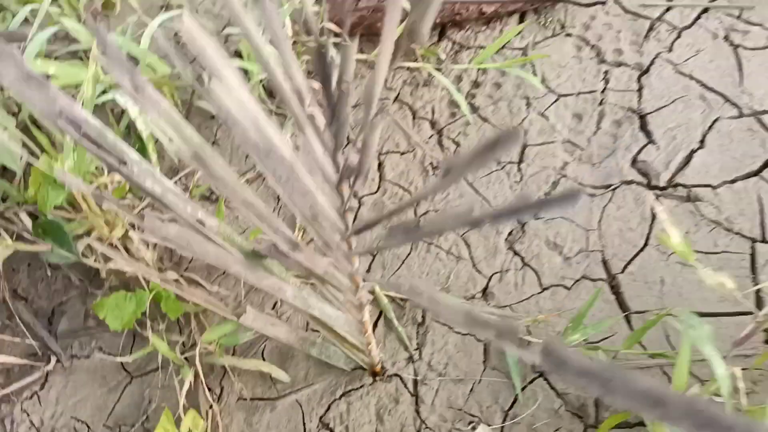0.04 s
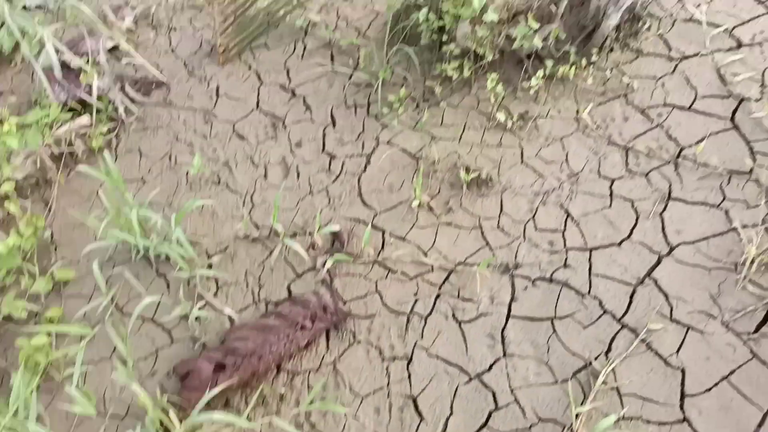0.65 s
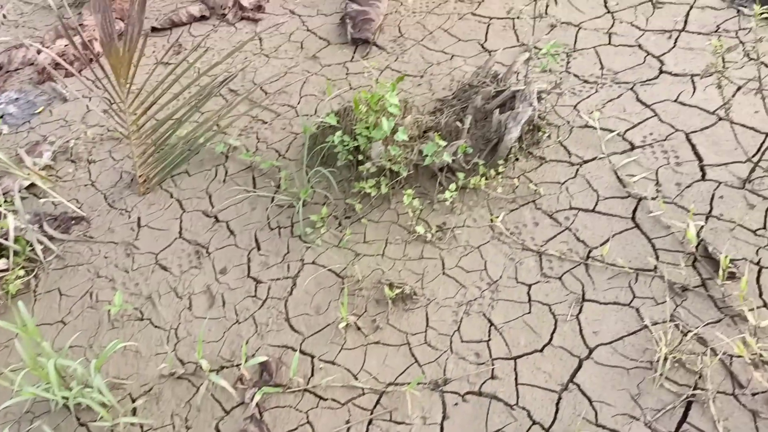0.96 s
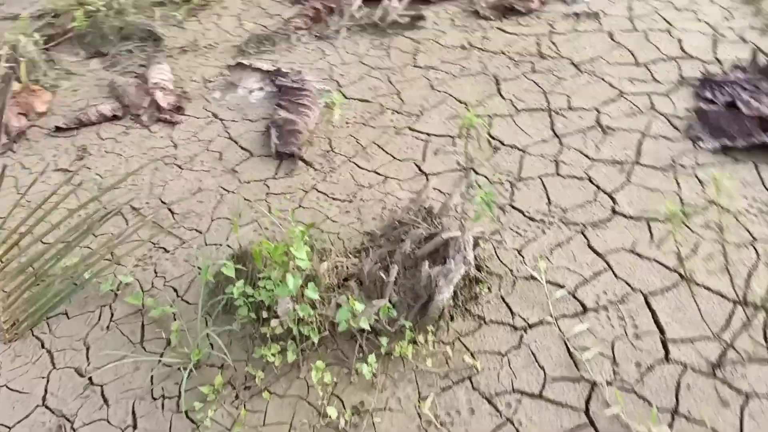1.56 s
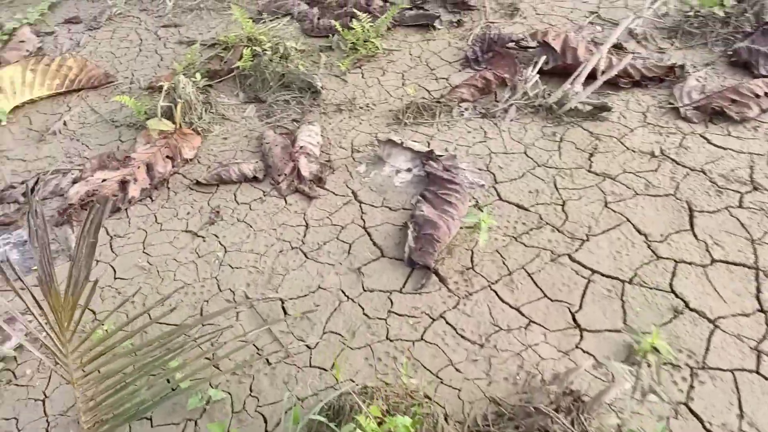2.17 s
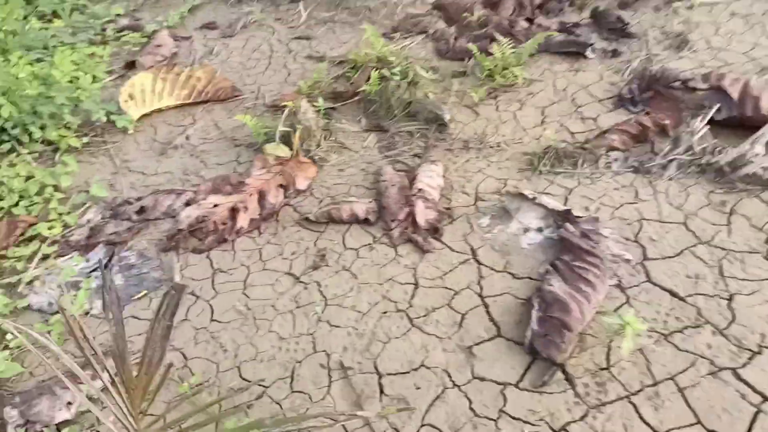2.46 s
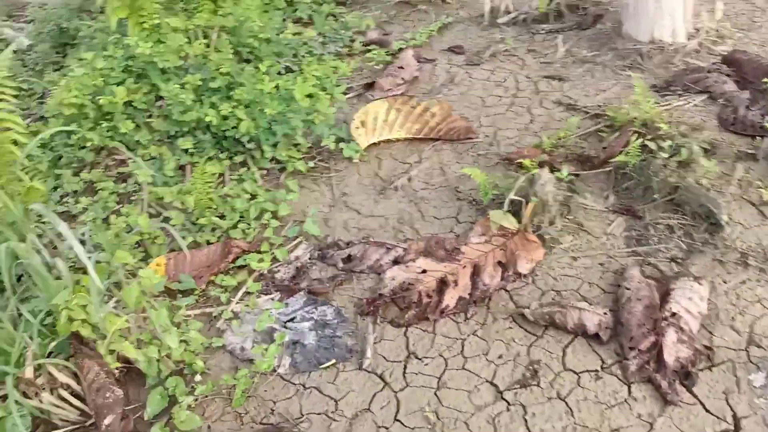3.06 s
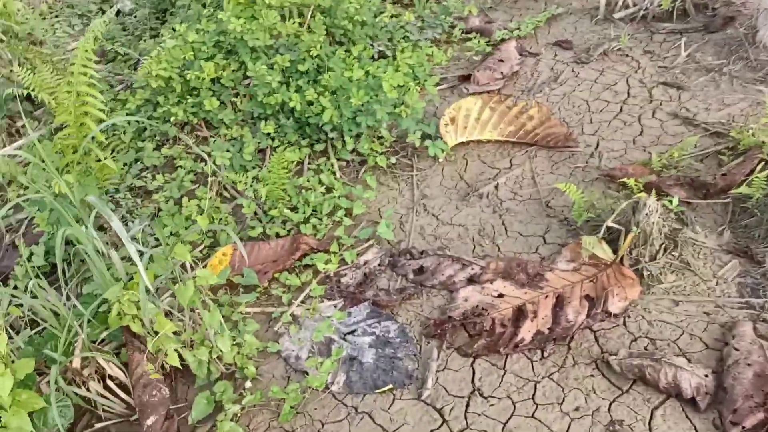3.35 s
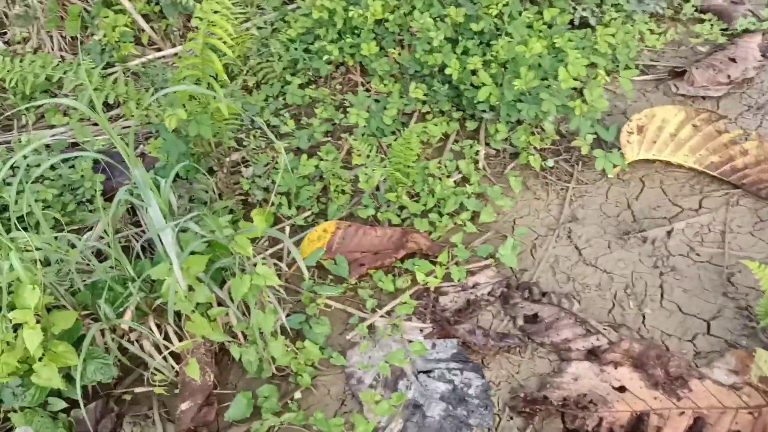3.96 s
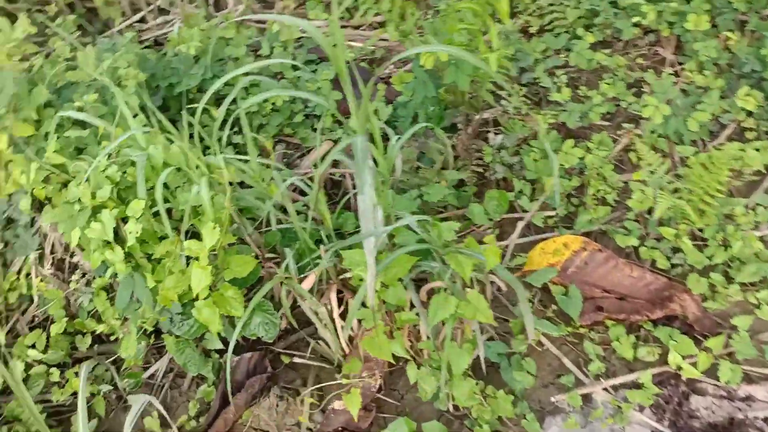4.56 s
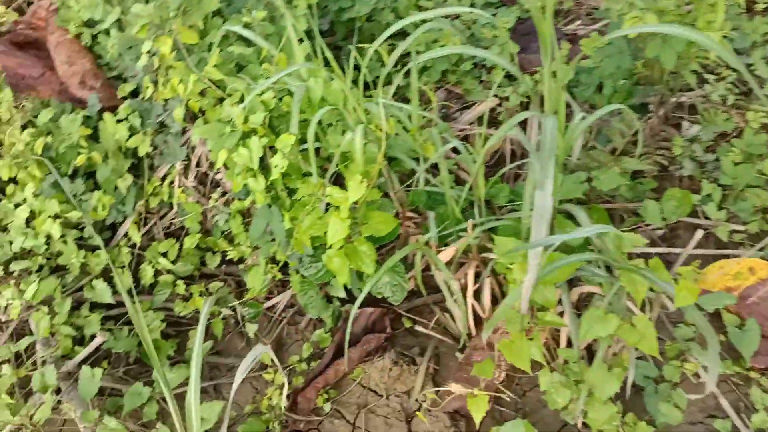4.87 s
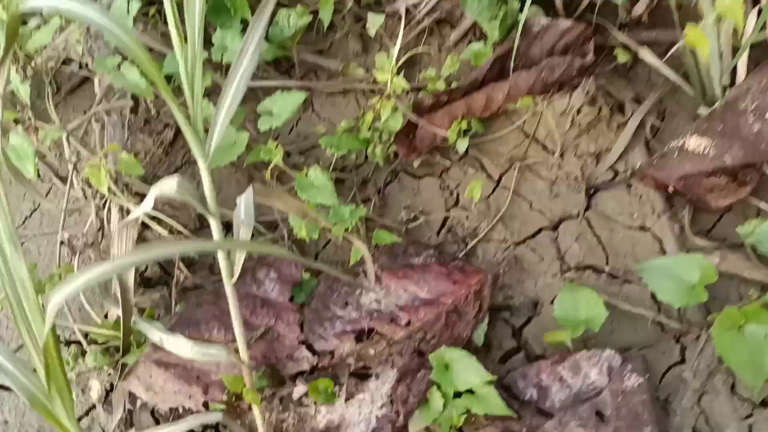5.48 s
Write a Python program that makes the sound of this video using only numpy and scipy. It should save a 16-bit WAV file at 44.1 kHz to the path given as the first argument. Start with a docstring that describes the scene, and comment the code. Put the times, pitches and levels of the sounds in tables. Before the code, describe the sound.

A very bright hiss comes and goes close to the left of the microphone, at times breaking into thin, fluttering whistles. Around it, crickets shrill steadily and buzz in pulses over a soft rush of open air, and a small bird chips about four times a second before pausing. Someone walks slowly over cracked mud at the edge of a field, with light thuds, gritty scuffs and a few sharp cracks of dry stalks.

```python
"""Soft steps thud and snap dry litter on a slow walk over cracked mud, at the edge of a weedy field.
Each sole knocks the ground, and each stalk cracks and rings. Close on the left a very high hiss
swells and at times turns into thin gliding whistles. Crickets scrape their wings: a chorus shrills,
and two nearer ones buzz and trill in pulses. A small bird repeats a falling chip. Behind it all
are the soft rush of open air and, at the start, one faint far whistle."""
import sys
import numpy as np
from scipy import signal
from scipy.fft import rfft, irfft
from scipy.io import wavfile
from scipy.ndimage import uniform_filter1d, map_coordinates

SR = 44100
rng = np.random.default_rng(int(sys.argv[2]) if len(sys.argv) > 2 else 0)


def log_audio(samples):
    """Write samples as a 16-bit WAV file to the path given in sys.argv[1]."""
    # one column per channel
    frames = np.atleast_2d(samples).T
    # limit to full scale, then quantise
    limited = np.clip(frames, -1, 1)
    pcm = np.round(limited * 32767).astype(np.int16)
    wavfile.write(sys.argv[1], SR, pcm)


N = 252252
T = np.arange(N) / SR

# Which side the air, grit and rumble lean to. Each row: frequency in Hz, left minus right in dB.
AIR_BALANCE = [(100,-0.5),(600,-0.5),(1400,2.5),(3200,1.5),(5000,3.5),(8500,-2.5),(11000,9.5),(14500,-34)]


def footfalls():
    """A sole thuds on dry mud; a harder landing rings the higher tones more."""
    # Each row: start in seconds, level in dB, length in seconds, hardness in dB per octave,
    # amount of crumbling from 0 to 1.
    steps = [(.023,-32,.05,4.5,.04),(2.102,-43,.056,2,.05),(2.349,-42,.03,2,.03),(2.635,-37,.04,-5,.02),(2.659,-40,.032,2,.03),(3.145,-42,.029,3,.04),(3.168,-42,.029,2.5,.04),(3.683,-36,.04,-5,.02),(3.802,-48,.042,2,.05),(3.865,-45,.03,4,.04),(4.452,-36,.02,1,.02),(4.464,-24.5,.04,-10,.012),(4.48,-41,.11,-1,.07),(5.121,-46,.05,1,.05),(5.326,-39,.04,-2,.04)]
    # The tones of a sole on mud. Each row: pitch in Hz, level in dB, ring time in seconds.
    sole_tones = [(280,-12.5,0.056),(356,-2.5,0.028),(474,1,0.021),(707,0,0.0072),(1010,-3,0.0049),(1480,-29.5,0.037)]
    thuds = 0
    for k, (hz, tone_db, t60) in enumerate(sole_tones):
        octaves = np.log2(hz / sole_tones[1][0])
        pushes = blows([(s, db + hardness * octaves, length, crumble)
                        for s, db, length, hardness, crumble in steps])
        thuds = thuds + (-1) ** k * from_db(tone_db - 2.5) * ring(pushes, hz, t60)
    return foliage(thuds, wet_db=-16, t60=.14)


def snapping_stalks():
    """A dry stalk breaks with a sharp crack, then rings briefly."""
    # Each row: start in seconds, level in dB, extra level for the crack in dB.
    snaps = [(.024,-37,-10),(.166,-44,16.5),(1.575,-33,-2),(1.621,-37,-8),(2.28,-40,-14),(2.303,-40,-14),(2.337,-36,-10),(2.631,-45,-14),(2.935,-42,-10),(3.142,-43,-14),(3.166,-48,-14),(4.326,-40,-8),(4.541,-44,-10),(5.308,-42,-12),(5.313,-28,-13)]
    # The tones of a dry stalk. Each row: pitch in Hz, level in dB, ring time in seconds.
    stalk_tones = [(930,-8.5,0.0099),(1170,-1,0.0054),(1630,5,0.0081),(1770,4.5,0.0047),(2355,7,0.0057),(2810,0.5,0.0044),(3700,-5,0.0057),(4830,-4.5,0.011)]
    pushes = blows([(s, db, .012, .028) for s, db, _ in snaps])
    rings = sum((-1) ** k * from_db(db) * ring(pushes, hz, t60)
                for k, (hz, db, t60) in enumerate(stalk_tones))
    cracks = blows([(s, db + crack_db, .004, .15) for s, db, crack_db in snaps])
    cracks = signal.sosfilt(signal.butter(2, [2500, 10000], "band", fs=SR, output="sos"), cracks)
    return foliage(from_db(-5) * rings + from_db(8) * cracks, wet_db=-9, t60=.1) * pan(2.5)


def shifting_grit():
    """Grit and leaves shift underfoot, making a grainy noise."""
    # Each row: start and end in seconds, level at the start and at the end in dB.
    scuffs = [(0,.36,-47,-53.5),(.81,.88,-53.5,-61),(1.15,1.62,-71,-54.5),(2.08,2.14,-56.5,-58),(2.28,2.37,-59,-68),(2.45,2.66,-63,-64),(3.13,3.2,-79,-60),(3.66,4.05,-68,-66),(4.46,4.8,-57.5,-64),(5.32,5.38,-55,-57.5),(5.6,5.72,-63,-54)]
    # The tone colour of a scuff. Each row: frequency in Hz, level in dB.
    colour = [(150,-41),(450,5),(900,-11.5),(1450,-4.5),(2500,-2.5),(5000,-3),(12000,-90)]
    grains = rng.standard_normal((2, N)) * from_db(3.5 * np.minimum(drift(250), 2))
    return swells(scuffs, rise_db_per_s=148, fall_db_per_s=99) * coloured(grains, colour, AIR_BALANCE)


def high_hiss():
    """A very bright hiss swells close on the left; its low part and top tones vary from swell to swell."""
    # Each row: start and end in seconds, level at the start and at the end in dB,
    # boost of the top tones in dB, boost of the low part in dB.
    hiss_swells = [(0,0.4,-53,-80,3,5),(0.783,1.116,-41,-42.5,5.5,-5.5),(1.156,1.388,-43,-46.5,1,-5),(1.425,1.617,-40.5,-38.5,2,-4.5),(1.779,1.782,-57.5,-61,-2,11.5),(1.871,1.865,-63,-53,-5,4),(2.114,2.162,-45.5,-49.5,-5,-4.5),(2.329,2.605,-49.5,-46,-4,1),(3.28,3.677,-54,-38.5,-5,-5.5),(3.826,3.812,-53,-44,-13,-7),(3.958,4.016,-57,-66,-9,8.5),(4.44,5.092,-47.5,-50.5,-15,-1.5),(5.19,5.228,-45,-44.5,-7,-4.5),(5.658,5.718,-40,-41.5,-1,-2.5)]
    # The tone colour of the hiss. Each row: frequency in Hz, level in dB.
    colour = [(1500,-14.5),(2400,-13),(3100,-1),(3800,-5.5),(4300,1),(6000,-5),(9500,-6.5),(10200,-5),(10800,0),(11250,-1),(11750,4),(13200,-9.5),(14200,-7),(15200,-17.5)]
    # Which side it leans to. Each row: frequency in Hz, left minus right in dB.
    balance = [(3000,-0.5),(9000,2.5),(10500,10),(13000,5.5),(15000,-18)]
    # Tones that ring in the hiss. Each row: pitch in Hz, level in dB, ring time in seconds.
    hiss_tones = [(12300,-5.5,.008),(13300,-5,0.0042),(13700,-17,.015)]
    rest_db, split_hz = -59, 9000
    rows = np.array(hiss_swells)
    plain_gain, top_gain, low_gain = [
        from_db(rest_db) + swells(rows[:, :4] + boost * np.array([0, 0, 1, 1]),
                                  rise_db_per_s=221, fall_db_per_s=351)
        for boost in (0, rows[:, 4:5], rows[:, 5:])]
    direct = near_left(rng.standard_normal(N), pan_db=0)
    scatter = rng.standard_normal((2, N))
    left, right = direct + scatter
    hiss = coloured(np.array([left + right, left - right]), colour, balance)
    low_part = signal.sosfiltfilt(signal.butter(2, split_hz, fs=SR, output="sos"), hiss)
    ringing = 0
    for k, (hz, db, t60) in enumerate(hiss_tones):
        gain = (top_gain if k else plain_gain) * from_db(db)
        ringing = ringing + gain * rms_one(ring(rng.standard_normal(N), hz, t60))
    flicker = from_db(.6 * drift(40))
    return flicker * (plain_gain * (hiss - low_part) + low_gain * low_part + near_left(ringing, pan_db=17))


def whistles():
    """Thin tones fan out and flutter as an arc of pitch climbs; past its turn they settle and close up."""
    # Each row: time of the turn, time before it and time after it in seconds, pitch at the turn in Hz,
    # drop at the ends in Hz, level in dB, raggedness from 0 to 1.
    arcs = [(2.32,.055,.04,12050,1400,-46,0),(2.382,.028,.025,12250,400,-39.5,.1),(2.468,.06,.054,15000,3000,-39,.5),(2.583,.056,.04,14750,2900,-38.5,.25),(2.72,.06,.1,12050,-500,-57,0),(2.872,.04,.04,10400,200,-53.5,0),(2.985,.02,.025,10450,400,-52,0),(4.435,.06,.07,12850,1400,-43.5,0),(4.525,.03,.03,11450,-300,-49,0),(4.63,.075,.08,15000,1700,-38.5,.8),(4.755,.055,.04,13400,400,-38,.6),(4.81,.035,.065,14500,1700,-37,.35),(4.895,.025,.025,11550,-250,-38.5,0),(4.97,.05,.055,14300,2000,-38,.9),(5.075,.045,.04,13700,1700,-40.5,.5),(5.212,.024,.03,13500,1900,-40,.5),(5.3,.05,.045,10300,-350,-55,0)]
    # The tones of the fan. Each row: share of the top tone's climb, level in dB.
    fan = [(1,0),(.84,-6),(.62,-6),(.45,-2),(.3,-3),(.14,-1),(-.25,-5)]
    # How strong a tone is as it glides. Each row: pitch in Hz, level in dB.
    colour = [(9000,-24),(10200,-10),(11100,-8),(11600,4),(12200,0),(14000,-1),(14700,-6),(15400,-18)]
    fan_foot_hz, least_spread_hz, end_fade_db = 11200, 900, 5
    flutter_hz, flutter_per_s, settle_s, rasp_hz = 270, 150, .04, 35
    turn_s, before_s, after_s, turn_hz, sag_hz, arc_db, ragged = np.transpose(arcs)[:, :, None]
    # 0 at the turn of an arc, 1 at its ends
    away = np.minimum(np.maximum((turn_s - T) / before_s, (T - turn_s) / after_s), 3) ** 2
    levels = arc_db - end_fade_db * away ** 2
    loudest = levels.argmax(axis=0), np.arange(N)  # only one arc sounds at a time
    top_hz = uniform_filter1d(np.clip((turn_hz - sag_hz * away)[loudest], 9000, 15500), SR // 100)
    unsettled = np.clip(1 - (T - turn_s) / settle_s, 0, 1)
    unrest = uniform_filter1d((ragged * unsettled)[loudest], SR // 100)
    shared_flutter = drift(flutter_per_s)
    tones, power = 0, 0
    for share, db in fan:
        glide = np.interp(T + .008 * drift(12), T, top_hz)  # each tone runs a little early or late
        hz = glide - (1 - share) * np.maximum(glide - fan_foot_hz, least_spread_hz)
        hz += rasp_hz * (drift(1400) + drift(30))
        hz += flutter_hz * unrest * (shared_flutter + drift(2 * flutter_per_s))
        gain = from_db(db + 7 * drift(28) + 5 * unrest * drift(200) + np.interp(hz, *np.transpose(colour)))
        tones = tones + gain * tone(hz)
        power = power + gain ** 2 / 2
    level_db = levels[loudest] + (1 + unrest) * drift(110)
    return near_left(tones / np.sqrt(power) * from_db(level_db), pan_db=11)


def wing_strokes(hz, per_s, fall_hz, wander_hz):
    """Each closing of a cricket's wings is a short tone that falls as the scraper slows."""
    cycle = np.cumsum(per_s * (1 + .04 * drift(12))) / SR % 1
    stroke = np.sin(np.pi * np.minimum(cycle / .72, 1)) ** 2
    return rms_one(stroke * tone(hz - fall_hz * (cycle - .35) + wander_hz * drift(150)))


def chirp_envelope(chirps, half_s):
    """Loudness of flat-topped bursts of strokes, each about twice half_s long."""
    return sum(from_db(db) * np.exp(-np.minimum(((T - s) / half_s) ** 4, 50)) for s, db in chirps)


def cricket_chorus(count=6, spread_hz=300):
    """Several far crickets shrill, each at its own pitch and stroke rate."""
    # How the chorus changes. Each row: time in seconds, level in dB, middle pitch in Hz.
    course = [(0.0, -52, 6640), (0.7, -51, 6780), (1.86, -52, 6680), (1.88, -55, 6470), (2.17, -49, 6710),
              (2.63, -52.5, 6480), (3.44, -53.5, 6630), (3.68, -52.5, 6680), (5.54, -55.5, 6460),
              (5.72, -56, 6700)]
    times, *columns = np.transpose(course)
    level_db, hz = [np.interp(T, times, column) for column in columns]
    voices = 0
    for place in np.linspace(-1, 1, count):
        voice = wing_strokes(hz + spread_hz * place, per_s=62 + 16 * place, fall_hz=357, wander_hz=70.2)
        gain = from_db(2 * drift(16) - .41 * place ** 2)
        voices = voices + foliage(voice * gain, wet_db=17, t60=.12)
    return from_db(level_db + 2) * rms_one(voices) * pan(3.3)


def buzzing_crickets(pitch_hz=8725, sag_hz_per_s=40):
    """Fast wing strokes come in chirps that slowly sink; a farther neighbour runs on a little lower."""
    # Runs of evenly spaced chirps. Each row: first and last chirp in seconds, chirps per second,
    # level of the first and of the last in dB.
    runs = [(.027,.181,6.5,-54.5,-53),(.335,2.03,6.5,-50.5,-49.5),(2.15,2.85,5.6,-51,-52),(3.04,3.65,6.5,-50,-52),(4.4,5.66,5.6,-58,-60)]
    chirps = []
    for first, last, per_s, first_db, last_db in runs:
        count = int(round((last - first) * per_s)) + 1
        chirps += zip(np.linspace(first, last, count), np.linspace(first_db, last_db, count))
    near = wing_strokes(pitch_hz - sag_hz_per_s * T, per_s=114, fall_hz=480, wander_hz=115)
    near *= chirp_envelope(chirps, half_s=.068)
    far = wing_strokes(8270, per_s=120, fall_hz=687, wander_hz=152.9) * from_db(-54.5 + 3.1 * drift(16))
    return foliage(near, wet_db=1.5, t60=.17) * pan(-1.8) + foliage(far, wet_db=20, t60=.061)


def trilling_cricket():
    """Slower, well separated strokes from a larger wing make a fine rattle."""
    # Each row: middle of a chirp in seconds, level in dB.
    chirps = [(.04,-59),(.21,-60),(.37,-56),(.55,-55),(.71,-54.5),(.9,-58),(1.075,-49),(1.26,-51.5),(1.425,-48.5),(1.595,-46),(1.72,-57),(1.855,-59),(2.12,-55),(2.5,-60),(4.6,-53),(4.75,-65)]
    song = wing_strokes(5350, per_s=80, fall_hz=473, wander_hz=72.8) * chirp_envelope(chirps, half_s=.035)
    return foliage(song, wet_db=-7, t60=.07) * from_db(-.5) * pan(2.5)


def bird():
    """Each nearly pure chip scoops up to its pitch, then falls ever faster; the trees smear it."""
    # About four chips a second. Each row: start in seconds, level in dB.
    chips = [(.235,-50),(.512,-42),(.758,-35.5),(1.004,-35),(1.25,-36.5),(1.483,-41),(1.716,-35.5),(1.964,-34),(2.214,-32.5),(2.466,-40),(2.708,-34.5),(2.956,-36.5),(3.212,-38),(3.468,-38),(3.72,-35.5),(5.652,-42)]
    pitch_hz, scoop_hz, fall_hz = 3420, 256, 580
    chip_s, scoop_s, attack_s, release_s = .066, .0042, .009, .02
    t, song = T[:SR // 4], np.zeros(N)
    quiver = 1 + .016 * drift(250)
    for (s, db), (higher, slower) in zip(chips, rng.standard_normal((len(chips), 2))):
        at, length = int(s * SR), chip_s * (1 + .065 * slower)
        hz = pitch_hz - scoop_hz * np.exp(-t / scoop_s) - fall_hz * np.minimum(t / length, 1) ** 2.07
        hz = hz * (1 + .0033 * higher) * np.roll(quiver, -at)[:len(t)]
        shape = np.clip(np.minimum(t / attack_s, (length - t) / release_s), 0, 1)
        song[at:at + len(t)] += (tone(hz) * shape * from_db(db))[:N - at]
    return from_db(-10) * (song * pan(-9.5) + foliage(song, wet_db=23, t60=.43))


def hand_rumble():
    """Jolts of the walker's moving hand make a low rumble."""
    # Each row: start and end in seconds, level at the start and at the end in dB.
    jolts = [(.07,.14,-57,-64),(1.6,1.68,-65,-71),(5.25,5.72,-62.5,-51)]
    # The tone colour of the rumble. Each row: frequency in Hz, level in dB.
    colour = [(25,4),(60,-11),(130,-6.5),(200,0),(350,-22.5),(2000,-70)]
    rumble = coloured(rng.standard_normal((2, N)), colour, AIR_BALANCE)
    return swells(jolts, rise_db_per_s=140, fall_db_per_s=51) * rumble


def far_whistle(pitch_hz=1524, sag_hz_per_s=500, hold_s=.33):
    """At the very start a faint whistle sinks and fades in the distance."""
    hz = pitch_hz - sag_hz_per_s * np.minimum(T, hold_s) + 45 * drift(120)
    call = tone(hz) * from_db(-64.5 - 140 * np.maximum(T - hold_s, 0))
    return foliage(call, wet_db=-2, t60=.3) * pan(3.8)


def open_air():
    """A soft, wide rush whose level wavers slightly."""
    # The tone colour of the air. Each row: frequency in Hz, level in dB.
    colour = [(25,-6),(45,1),(70,5),(130,7),(240,-2),(480,-2.5),(800,-12),(1700,-14.5),(2500,-6),(3200,-4),(3750,-8.5),(4400,-11.5),(5100,-0.5),(6000,-1),(9000,-1),(10500,-7),(14500,-30.5)]
    return from_db(-48 + .5 * drift(3.46)) * coloured(rng.standard_normal((2, N)), colour, AIR_BALANCE)


def foliage(x, wet_db, t60):
    """Plants and ground add scattered echoes at wet_db, different at each ear; total power is kept."""
    t = T[:SR // 2]
    tail = rng.standard_normal((2, len(t))) * from_db(-60 * t / t60) * (t > .003)
    tail /= np.sqrt(np.sum(tail ** 2, axis=1, keepdims=True))
    wet = from_db(wet_db)
    return (x + wet * signal.fftconvolve(x[None], tail, axes=1)[:, :N]) / np.sqrt(1 + wet ** 2)


def blows(rows):
    """Each blow is one push followed by a dying spray of small ones."""
    pushes, t = np.zeros(N), T[:SR // 4]
    for s, db, length, crumble in rows:
        spray = crumble * rng.standard_normal(len(t)) * from_db(-30 * t / length)
        spray[0] = 1
        at = int(s * SR)
        pushes[at:at + len(t)] += (from_db(db) * spray)[:N - at]
    return pushes


def ring(clicks, hz, t60):
    """Each click sets a pure tone ringing, which fades by 60 dB in t60 seconds."""
    decay, angle = from_db(-60 / (t60 * SR)), 2 * np.pi * hz / SR
    return signal.lfilter([0, np.sin(angle)], [1, -2 * decay * np.cos(angle), decay ** 2], clicks + 1e-18)


def swells(rows, rise_db_per_s, fall_db_per_s):
    """Loudness of sounds that rise, hold on a slope and die away."""
    return sum(from_db(np.interp(T, [start, end], [first_db, last_db])
                       - rise_db_per_s * np.maximum(start - T, 0) - fall_db_per_s * np.maximum(T - end, 0))
               for start, end, first_db, last_db in rows)


def coloured(noises, colour, balance):
    """Two noises become a left and right pair with this tone colour; the bass is alike in both ears."""
    # Each row: frequency in Hz, how alike the two ears are from 0 to 1.
    likeness = [(30,0.36),(70,1),(300,0.8),(600,0.66),(1200,0.29),(2500,0),(15000,0.12)]
    mid, side = rfft(noises)
    alike = np.clip(over_bins(likeness), -1, 1)
    pair = np.sqrt(1 + alike) * mid + np.sqrt(1 - alike) * side * [[1], [-1]]
    return rms_one(irfft(pair * from_db(over_bins(colour)) * pan(over_bins(balance)), N))


def over_bins(points):
    """Joins (Hz, value) points into a curve over every frequency of the spectrum."""
    hz, value = np.transpose(points)
    return np.interp(np.log(np.arange(N // 2 + 1) * SR / N + 1), np.log(hz), value)


def near_left(x, pan_db, delay_samples=13):
    """The left side is louder by pan_db and arrives a few samples later."""
    return np.array([np.pad(x, (delay_samples, 0))[:N], x]) * pan(pan_db)


def pan(db):
    """Left and right gains of constant power; positive dB leans left."""
    gains = from_db(np.array([[.5], [-.5]]) * db)
    return gains / np.sqrt(np.mean(gains ** 2, axis=0))


def drift(rate):
    """A random wander of about 1 either way, turning rate times a second."""
    knots = rng.standard_normal(8192)
    return map_coordinates(knots, [T * rate + 2], order=1, mode="wrap") * np.sqrt(3 / 2)


def tone(hz):
    return np.sin(2 * np.pi * np.cumsum(hz) / SR)


def from_db(db):
    return 10 ** (np.asarray(db) / 20)


def rms_one(x):
    return x / np.sqrt(np.mean(x ** 2) + 1e-20)


def scene():
    """The field, the close hiss and the walk sound together."""
    field = open_air() + cricket_chorus() + buzzing_crickets() + trilling_cricket() + bird() + far_whistle()
    close = high_hiss() + whistles()
    walk = shifting_grit() + hand_rumble() + footfalls() + snapping_stalks()
    return field + close + walk


def record(dry):
    """The very highest treble is cut off steeply."""
    cutoff_hz = 15100
    return signal.sosfilt(signal.ellip(12, .2, 80, cutoff_hz, fs=SR, output="sos"), dry)


dry = scene()
out = record(dry)
log_audio(out)
```